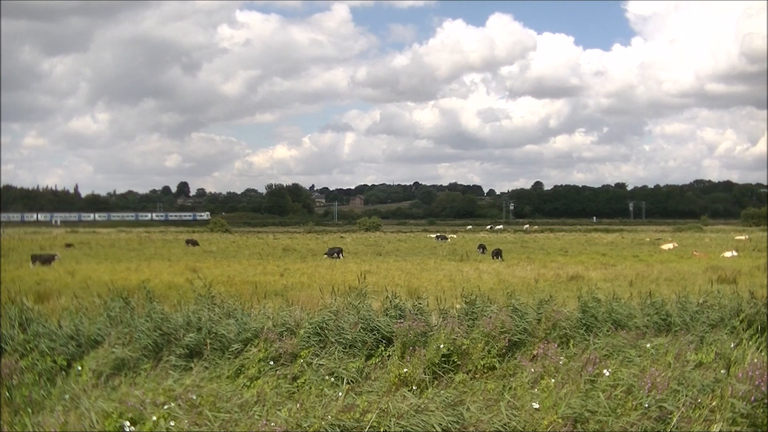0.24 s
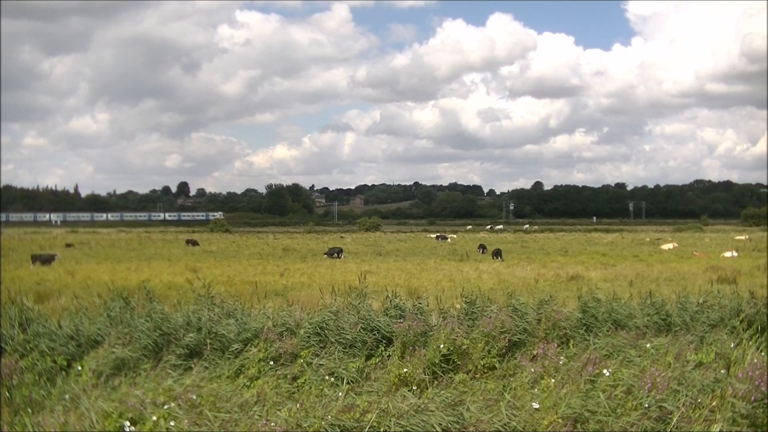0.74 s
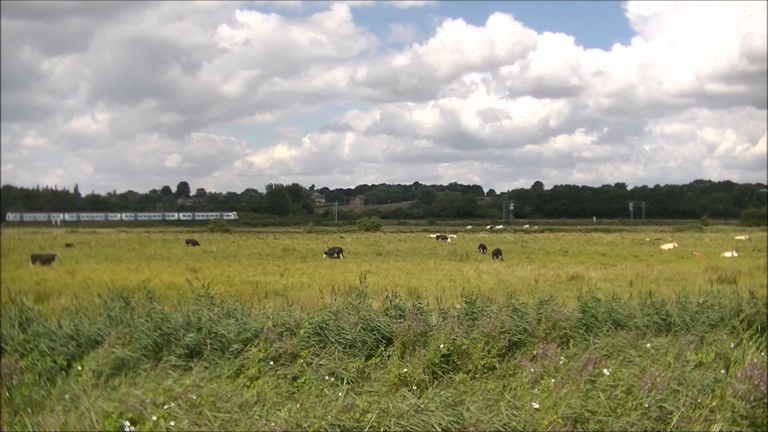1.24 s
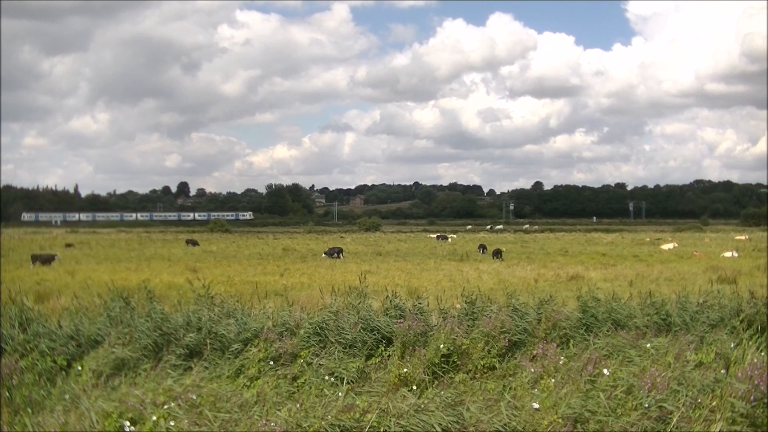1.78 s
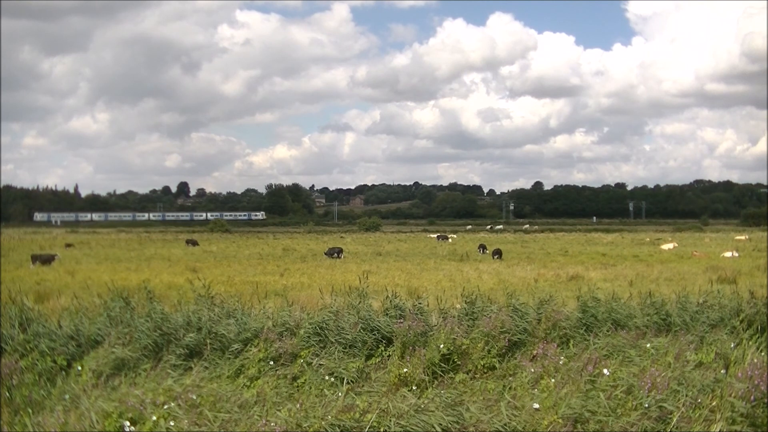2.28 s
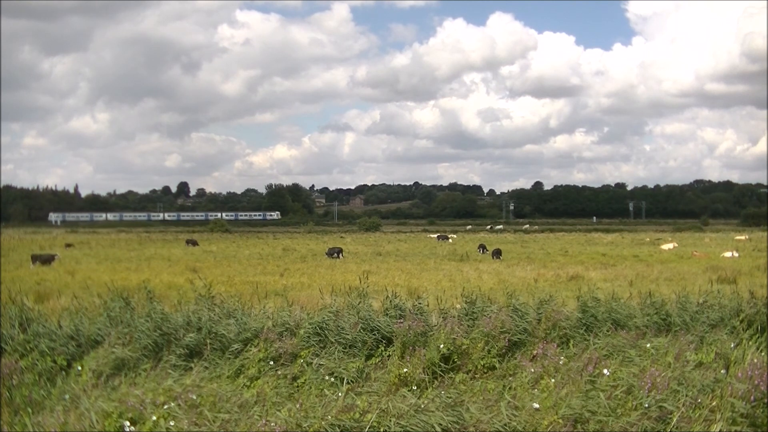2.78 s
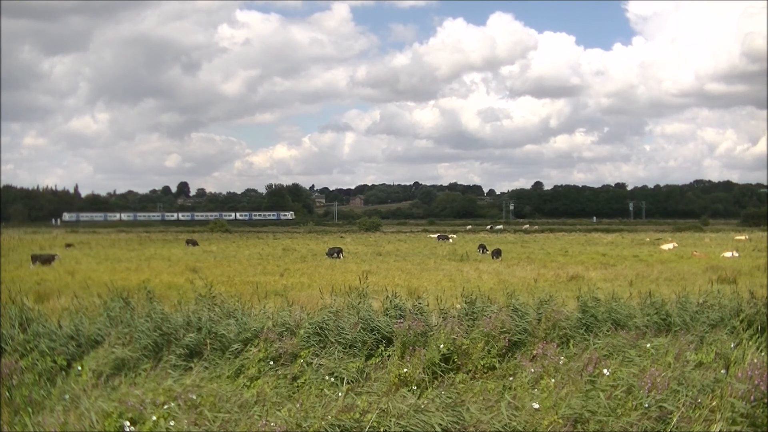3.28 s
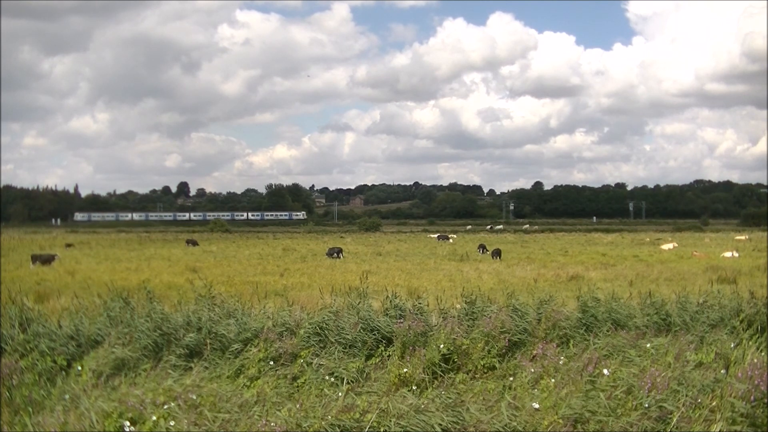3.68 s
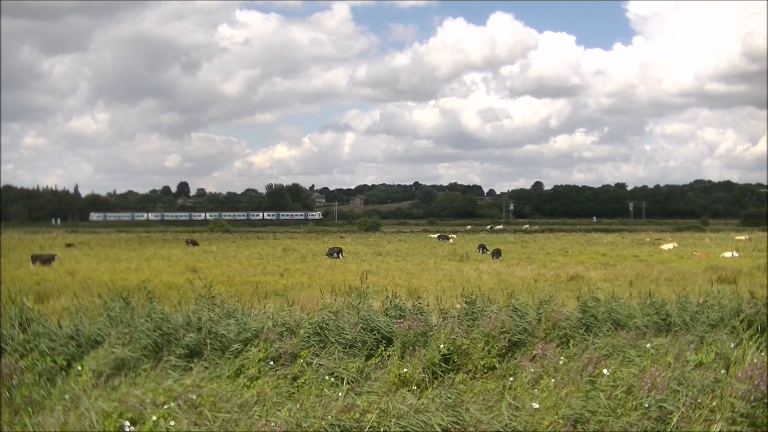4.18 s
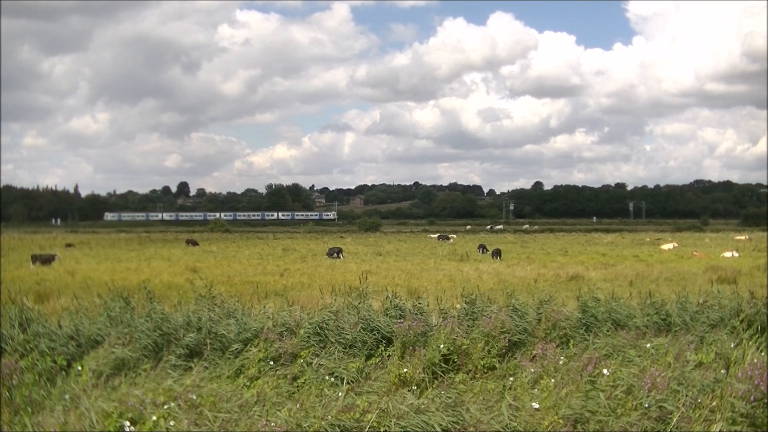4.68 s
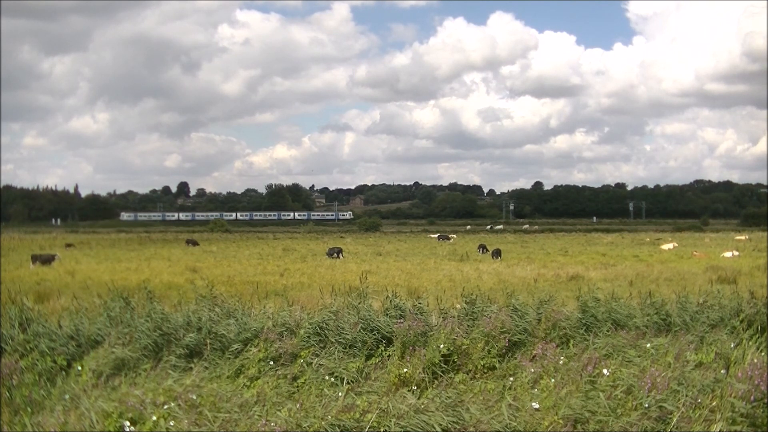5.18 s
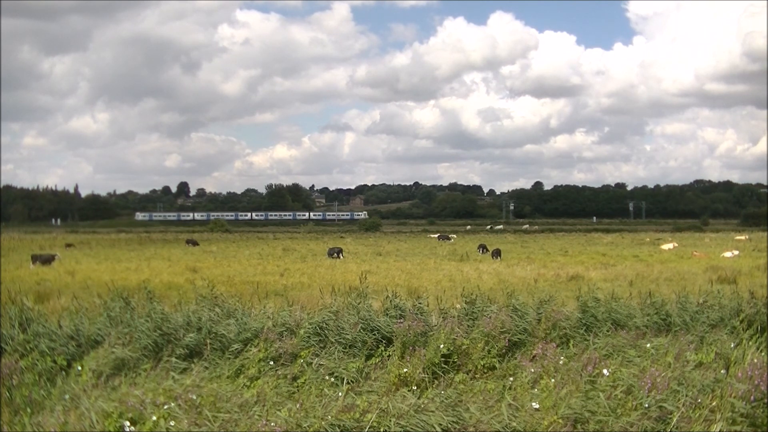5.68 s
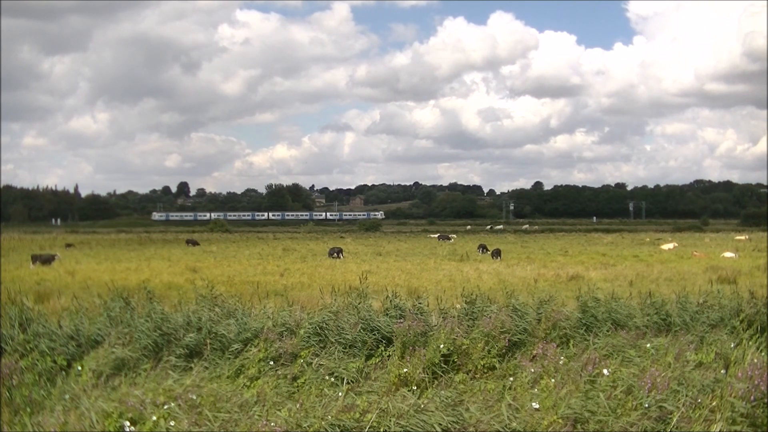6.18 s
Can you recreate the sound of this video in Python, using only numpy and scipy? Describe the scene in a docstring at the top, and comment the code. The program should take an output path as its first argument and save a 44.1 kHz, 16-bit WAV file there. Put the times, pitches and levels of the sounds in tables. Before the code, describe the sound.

Breezy open fen: a passing car fades off to the right, gusts stir reeds, distant jackdaws chirp, and a second car nears from the left.

```python
"""Open fenland on a breezy day, with the steady wash of far traffic and wind.
First a car rushes away along a road behind the listener: shaped noise and narrow howls, thinning with distance.
Reeds rustle throughout as modulated noise and swell in two gusts; a few dry stems tick as decaying noise bursts.
Jackdaws then chirp some way off, as short falling harmonic tones with a thin echo.
Last a second car draws near from the left, its low engine hum (narrow noise) ahead of its roar."""
import sys
import numpy as np
from scipy import signal
from scipy.fft import rfft, irfft, next_fast_len
from scipy.io import wavfile
from scipy.ndimage import uniform_filter1d, map_coordinates

SR = 44100
rng = np.random.default_rng(int(sys.argv[2]) if len(sys.argv) > 2 else 0)


def master(y):
    """Save y as 16-bit WAV."""
    cut = np.clip(np.atleast_2d(y).T, -1, 1)
    pcm = np.round(cut * 32767)  # scale
    wavfile.write(sys.argv[1], SR, pcm.astype(np.int16))


N = 284004  # length of the scene [samples]

# Relative noise spectra of the cars: (frequency [Hz], level [dB per Hz])
LEAVING_ROAR = [(150, -80.5), (420, -16.5), (610, -6.5), (760, -1.5), (900, -2.5), (1180, -1.5), (1380, -5),
                (1650, -5), (2100, -10), (2750, -17), (3300, -26.5), (4600, -52)]
COMING_ROAR = [(280, -58), (450, -18), (620, -7), (760, -2), (1000, 2.5), (1400, -5), (2000, -6),
               (2600, -10), (3400, -20.5), (4600, -43)]
BODY_RUMBLE = [(15, -65), (30, -55), (60, -38), (90, -26), (125, -23), (180, -15), (300, -6.5), (480, 0),
               (620, -1), (800, -5.5), (1200, -58)]
TREAD_HISS = [(600, -80), (1800, -8.5), (2700, 0), (3400, -1.5), (4400, 0), (5300, -10.5), (6600, -18.5),
              (8400, -18), (10000, -30), (15500, -44)]
TREAD_SIZZLE = [(1500, -80), (4000, -6), (5400, 3.5), (6500, 0), (8000, -4), (9500, -11), (12500, -17.5),
                (15500, -32)]
# Relative noise spectra of the fen: (frequency [Hz], level [dB per Hz])
FAR_AIR = [(25, -45), (50, -32), (90, -32), (150, -18), (250, -15.5), (360, -8.5), (480, -4.5), (580, -6.5),
           (740, -0.5), (1000, 2.1), (1500, -3), (2800, -13), (4300, -18), (5400, -21), (8000, -26),
           (15500, -30.5)]
REED_RUSTLE = [(100, -60), (500, -8), (900, -4.5), (1350, 4), (2000, 1.5), (2750, 0), (3100, -10),
               (3900, -9.5), (4400, -8), (5200, -22), (8000, -43), (15000, -63)]
# Left-right likeness of sound from all around, and from the road: (frequency [Hz], coherence [1])
DIFFUSE_COHERENCE = [(30, 0.66), (130, 0.96), (300, 0.41), (700, 0.83), (1400, 0.86), (2700, 0.77),
                     (4300, 0.39), (5500, 0), (8000, 0)]
ROAD_COHERENCE = [(30, .4), (70, .88), (250, .99), (700, .99), (1400, .98), (2500, .92), (4000, .85),
                  (8000, .72), (14000, .58)]
# Stereo cues of sound from far round to the right: (frequency [Hz], left lead [rad])
RIGHT_PHASE = [(100, 0), (500, -.22), (1460, -.56), (3300, -.82), (4500, -.95), (6000, -1.5), (7400, -2.45),
               (10500, -2.95), (15000, -3.25)]
# and its balance: (frequency [Hz], left minus right [dB])
RIGHT_BALANCE = [(300, -0.8), (900, -.9), (1700, -2.5), (3600, -2), (5000, 1), (6200, 0.5), (8000, -2.5),
                 (15000, -1)]

# Losses of tyre roar, body rumble and tread hiss, one row each:
# (relative level when closest [dB], loss per tenfold distance [dB], absorption per road distance [dB])
LEAVING_LOSS = [(-16.5, 25.5, 0.3), (-33, 10.5, 2), (-29, 28.5, 0.06)]
COMING_LOSS = [(-25.5, 24, 0.02), (-46.8, 6.1, 0.36), (-39.5, 32, 0.15)]
# Howl of the leaving car's tyres, against its roar: (time [s], level [dB])
LEAVING_HOWL = [(0, -6.5), (0.45, -15.5), (0.8, -9), (1.4, -14.5), (1.85, -4), (2.2, -21), (2.9, -3.5),
                (3.6, -16)]
# Small rises and dips in the leaving car's level: (time [s], gain [dB])
LEVEL_WAVER = [(0.06, 0.4), (0.24, 0), (0.38, 0), (0.52, 0.2), (0.66, -2), (0.85, 0.2), (2.1, -0.3),
               (2.5, -0.8), (2.95, 0.5)]
# Low hum of the nearing car's engine: (time [s], level [dB])
ENGINE_HUM = [(4.2, -78), (4.9, -65.5), (5.6, -68), (6, -58.5), (6.44, -61.5)]

# Gusts over the reed bed: (time [s], half-length [s], level [dB])
GUSTS = [(2.17, 0.23, -51.5), (4.98, 0.66, -44.5)]
# Dry stems ticking: (time [s], relative level [dB])
TICKS = [(1.242, -42), (1.357, -34), (1.3956, -41), (3.534, -38.5), (3.948, -43.5), (3.9563, -46),
         (5.3894, -36)]
# Resonance of a knocked stem: (frequency [Hz], gain [dB])
STEM_RESONANCE = [(1500, -20), (3300, 8), (4800, 12), (7500, 0.5), (10000, -6), (15000, -12)]
# Jackdaw chirps: (time [s], length [s], starting pitch [Hz], relative level [dB])
CHIRPS = [(3.643, 0.032, 1170, -37), (3.681, 0.027, 1140, -42), (3.768, 0.045, 1270, -45),
          (3.868, 0.028, 1180, -48), (4.014, 0.026, 1190, -55), (4.42, 0.04, 1180, -42.5),
          (4.445, 0.026, 1130, -43), (4.636, 0.039, 1340, -41.5), (4.678, 0.028, 1298, -42),
          (4.719, 0.036, 1210, -44), (4.954, 0.04, 1280, -39.5), (5.26, 0.0472, 1385, -39.5),
          (5.334, 0.022, 1230, -44), (5.687, 0.028, 1140, -42), (5.744, 0.031, 1340, -42),
          (5.768, 0.034, 1370, -49), (5.812, 0.026, 1310, -46), (5.886, 0.03, 1180, -44)]
# Resonance of the jackdaw's throat: (frequency [Hz], gain [dB])
THROAT_RESONANCE = [(900, -20), (1500, 4), (2100, 12.5), (2650, 2.5), (3050, 0), (3400, -21), (4400, -15),
                    (6000, -58)]

# moment each car is closest, and the time it takes to drive as far as the road is away
LEAVING_PASS_S, COMING_PASS_S, ROAD_S = 0.06, 6.905, 0.25
# the first car starts to sink out of earshot, the second has come into it
LEAVING_LAST_S, LEAVING_FADE_S = 3.3, 1
COMING_FIRST_S, COMING_FADE_S = 5.91, 0.42
# share by which pitch sinks between the closest point and far down the road
PITCH_SINK = 0.16
# ground bounce: share at a grazing angle, notch at the closest point, power of distance by which it climbs
GROUND_SHARE, NOTCH_HZ, NOTCH_CLIMB = 0.15, 330, 1.79
HUM_HZ = 264
BREEZE_DB = -59
SLUR_HZ_PER_S = 5900  # mean fall of pitch within a chirp, before its roughness
TOP_HZ = 15750


def amp(db):
    """Logarithmic measure: 20 dB is a tenfold amplitude."""
    return 10 ** (np.asarray(db) / 20)


def unit(x):
    """Normalisation: mean power is brought to 1."""
    return x / np.sqrt(np.mean(x ** 2) + 1e-20)


def along(points, hz):
    """Logarithmic frequency scale: a table is interpolated along it."""
    f, values = np.transpose(points)
    return np.interp(np.log(hz + 1), np.log(f + 1), values)


def curves(rows):
    """Linear interpolation in time: one curve for each column after the time."""
    s, *columns = np.transpose(rows)
    t = np.arange(N) / SR
    return [np.interp(t, s, column) for column in columns]


def wobble(rate):
    """Slow random modulation: a smooth curve through random knots, rate of them a second."""
    knots = rng.standard_normal(int(N * rate / SR) + 4)
    return map_coordinates(knots, [np.arange(N) * rate / SR])


def filtered(x, response):
    """Linear filtering: a spectrum is multiplied by a complex response of frequency."""
    m = next_fast_len(N + 8192)
    hz = np.fft.rfftfreq(m, 1 / SR)
    return irfft(rfft(x, m) * response(hz), m)[..., :N]


def add(track, s, sound):
    """Superposition: a short sound is summed into a track at time s."""
    part = track[..., round(s * SR):][..., :sound.shape[-1]]
    part += sound[..., :part.shape[-1]]


def rush(spectrum, coherence, patchy_db):
    """Partial coherence: mid and side noise, patchy in time and pitch, mix to stereo of rms 1."""
    noise = signal.stft(rng.standard_normal((2, N)), nperseg=512)[2]
    patches = rng.standard_normal(noise.shape[1:])
    patches = uniform_filter1d(patches, size=4, axis=0)
    patches = uniform_filter1d(patches, size=12, axis=1)
    pair = signal.istft(noise * amp(patchy_db * unit(patches)), nperseg=512)[1][:, :N]

    def response(hz):
        angle = np.arccos(np.clip(along(coherence, hz), -1, 1)) / 2
        return amp(along(spectrum, hz)) * np.array([np.cos(angle), np.sin(angle)])

    mid, side = filtered(pair, response)
    return unit(np.array([mid + side, mid - side]))


def narrow(hz, width_hz):
    """Quadrature modulation: two random curves spread a carrier into a narrow band of rms 1."""
    phase = 2 * np.pi * np.cumsum(hz) / SR
    return unit(wobble(width_hz) * np.cos(phase) + wobble(width_hz) * np.sin(phase))


def placed(x, right_lead_us, right_db):
    """Time and level differences between the two sides give direction; negative values favour the left."""
    sides = np.array([[-.5], [.5]])
    lead_s = right_lead_us / 1e6
    return filtered(x, lambda hz: amp(sides * right_db) * np.exp(2j * np.pi * hz * sides * lead_s))


def from_right(x):
    """Diffraction and shading: left-right phase and balance vary with pitch for sound from the right."""
    sides = np.array([[.5], [-.5]])
    return filtered(x, lambda hz: amp(sides * along(RIGHT_BALANCE, hz))
                    * np.exp(1j * sides * along(RIGHT_PHASE, hz)))


def drive(pass_s):
    """Doppler effect on a straight road: distance (1 at its closest) and the factor on pitch."""
    travelled = (np.arange(N) / SR - pass_s) / ROAD_S
    far = np.hypot(1, travelled)
    return far, 1 - PITCH_SINK * travelled / far


def earshot(beyond_s, fade_s):
    """Exponential attenuation: beyond a point on the road a sound sinks out of earshot."""
    return np.exp(-np.maximum(beyond_s, 0) / fade_s)


def off_ground(x, far):
    """Comb interference: a delayed ground bounce makes a notch that climbs with distance."""
    late = SR / (2 * NOTCH_HZ * far ** NOTCH_CLIMB)
    share = GROUND_SHARE * (1 - 1 / far ** 2)
    bounce = np.array([map_coordinates(side, [np.arange(N) - late]) for side in x])
    return (x + share * bounce) / (1 + share)


def car(far, losses, roar_spectrum, howl, flutter_db):
    """Spreading and absorption: tyre roar, howl and tread hiss over body rumble fade with distance."""
    roar_db, rumble_db, hiss_db = [closest_db - spread * np.log10(far) - absorbed * (far - 1)
                                   for closest_db, spread, absorbed in losses]
    tyres = amp(roar_db) * (rush(roar_spectrum, ROAD_COHERENCE, patchy_db=1.46) + howl)
    body = amp(rumble_db + 2.2) * rush(BODY_RUMBLE, ROAD_COHERENCE, patchy_db=-0.5)
    # the nearer the car, the more top sizzle is left in the hiss
    sizzle = amp(0.89 * hiss_db + 21.5) * rush(TREAD_SIZZLE, ROAD_COHERENCE, patchy_db=4.0)
    hiss = amp(hiss_db) * (rush(TREAD_HISS, ROAD_COHERENCE, patchy_db=1.4) + sizzle)
    return body + (tyres + hiss) * amp(flutter_db * wobble(14))


def leaving_car():
    """Doppler effect on recession: the tread grooves' howl and a broader whirr sink in pitch."""
    t = np.arange(N) / SR
    far, bend = drive(LEAVING_PASS_S)
    howl_db, = curves(LEAVING_HOWL)
    howl = amp(howl_db) * narrow(1022 * bend, width_hz=170)
    # the whirr stands out more from afar, but is lost first
    whirr = amp(-15.5 + 14.5 * np.log10(far)) * narrow(1690 * bend, width_hz=520)
    whirr = whirr * earshot(t - 2.17, fade_s=0.09)
    sound = car(far, LEAVING_LOSS, LEAVING_ROAR, howl + whirr, flutter_db=0.85)
    waver_db, = curves(LEVEL_WAVER)
    fade = earshot(t - LEAVING_LAST_S, LEAVING_FADE_S)
    return amp(waver_db) * fade * off_ground(sound, far)


def distance():
    """Diffuse field: far traffic and wind blend into a steady wash with a thin hiss on top."""
    return amp(-45.0) * rush(FAR_AIR, DIFFUSE_COHERENCE, patchy_db=1.42)


def reeds():
    """Friction noise: leaves brush together in a fine rustle that swells with each gust."""
    t = np.arange(N) / SR
    gusts = sum(amp(db) * np.exp(-((t - s) / half_s) ** 2) for s, half_s, db in GUSTS)
    breeze = amp(BREEZE_DB) + gusts
    flurries_db = 0.82 * wobble(15) + 0.47 * wobble(76)
    return breeze * amp(flurries_db) * rush(REED_RUSTLE, DIFFUSE_COHERENCE, patchy_db=2.0)


def stems(t60):
    """Impact and damping: dry stems knock with a tiny bright crack that falls 60 dB in t60 seconds."""
    ticks = np.zeros((2, N))
    t = np.arange(SR // 20) / SR
    for s, db in TICKS:
        add(ticks, s, amp(db - 7 - 60 * t / t60) * rng.standard_normal((2, len(t))))
    return filtered(ticks, lambda hz: amp(along(STEM_RESONANCE, hz)))


def jackdaws():
    """Source and resonator: a rough falling tone's second harmonic sits in the throat's resonance."""
    calls = np.zeros(N)
    for s, length, start_hz, db in CHIRPS:
        u = np.linspace(0, 1, round(length * SR))
        rasp = 1 + .02 * wobble(400)[:len(u)]
        pitch = (start_hz - SLUR_HZ_PER_S * length * u ** 1.685) * rasp
        phase = 2 * np.pi * np.cumsum(pitch) / SR
        voice = sum(amp(along(THROAT_RESONANCE, k * pitch)) * np.sin(k * phase) for k in range(1, 5))
        swell = np.sqrt(abs(np.sin(np.pi * u)))
        add(calls, s, amp(db) * unit(voice) * swell)
    return calls


def field_echo(x, t60):
    """Scattering: banks and hedges return a short, thin tail, here noise with a soft onset."""
    t = np.arange(SR // 2) / SR
    decay = amp(-60 * t / t60) * (1 - np.exp(-t / 0.018))
    tail = rng.standard_normal((2, len(t))) * decay
    return signal.fftconvolve(x[None], tail / np.linalg.norm(tail[0]), axes=1)[:, :N]


def coming_car():
    """Spreading loss on approach: a low engine hum is heard first, then roar and howl swell."""
    t = np.arange(N) / SR
    far, bend = drive(COMING_PASS_S)
    # the howl carries ahead of the car, so it stands out more from afar
    howl = amp(-16 + 13 * np.log10(far)) * narrow(805 * bend, width_hz=200)
    hum_db, = curves(ENGINE_HUM)
    hum = amp(hum_db) * narrow(np.full(N, HUM_HZ), width_hz=90)
    fade = earshot(COMING_FIRST_S - t, COMING_FADE_S)
    return hum + fade * car(far, COMING_LOSS, COMING_ROAR, howl, flutter_db=-1.2)


def scene():
    """Superposition: one car leaves to the right, the next comes from the left; reeds and birds lie ahead."""
    road = from_right(leaving_car()) + placed(coming_car(), right_lead_us=-41, right_db=-1.3)
    birds = jackdaws()
    echo = field_echo(birds, t60=0.2)
    fen = reeds() + distance() + amp(-1.5) * birds + amp(-8) * echo
    return road + placed(fen, right_lead_us=25, right_db=-0.15) + stems(t60=0.027)


def record(dry):
    """Band limitation: nothing at or above the top frequency is kept."""
    return filtered(dry, lambda hz: hz < TOP_HZ)


dry = scene()
out = record(dry)
master(out)
```